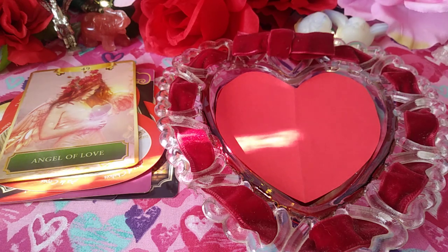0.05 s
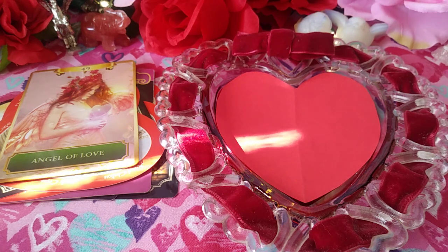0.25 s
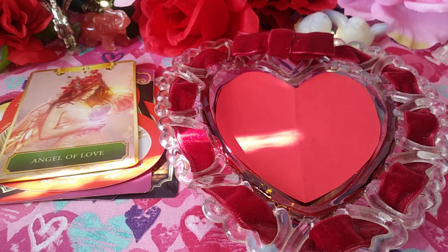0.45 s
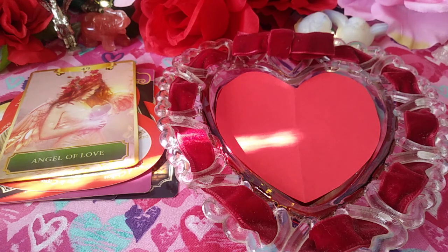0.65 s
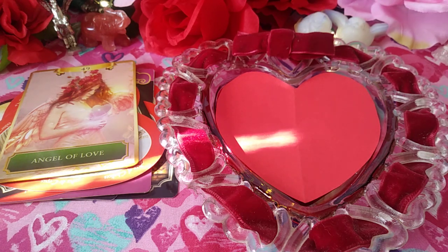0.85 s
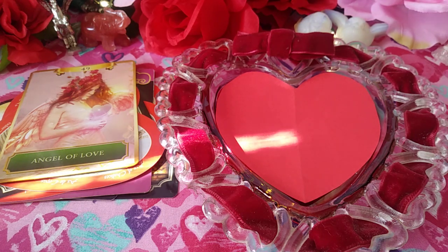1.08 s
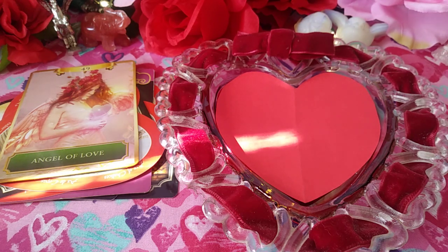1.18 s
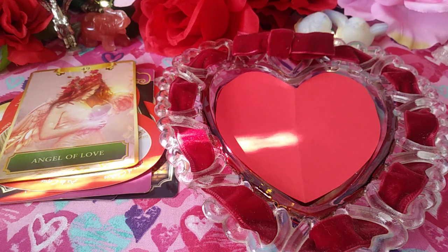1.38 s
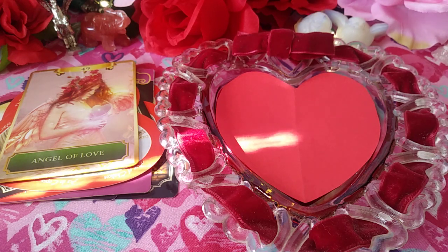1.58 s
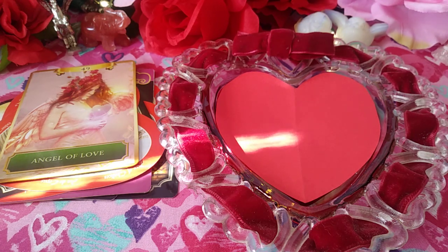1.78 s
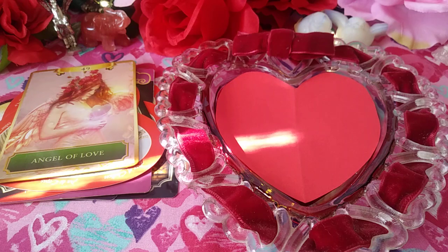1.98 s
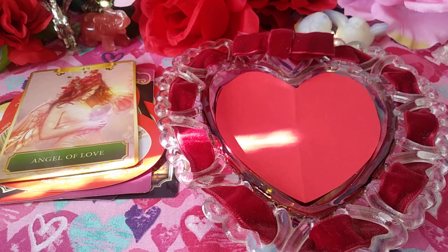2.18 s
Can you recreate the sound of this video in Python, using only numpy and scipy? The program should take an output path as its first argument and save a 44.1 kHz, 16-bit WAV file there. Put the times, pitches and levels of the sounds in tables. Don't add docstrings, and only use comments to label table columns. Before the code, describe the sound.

Small metal charms are stirred by hand in a shallow box on a table, rattling and tinkling brightly, falling nearly quiet, then clinking hard again; close, thin-sounding microphone in a small, fairly dry room.

```python
import sys
import numpy as np
from scipy import signal
from scipy.fft import rfft, irfft
from scipy.io import wavfile
from scipy.ndimage import uniform_filter1d

SR = 44100
rng = np.random.default_rng(int(sys.argv[2]) if len(sys.argv) > 2 else 0)


def convert_level_to_amplitude(level_db):
    exponent = np.asarray(level_db, float) / 20
    return 10 ** exponent


def put_to_file(sound):
    columns = np.atleast_2d(sound).T
    safe = np.clip(columns, -1, 1)
    whole_steps = np.round(safe * 32767)
    wavfile.write(sys.argv[1], SR, whole_steps.astype(np.int16))


N = 98651


def evened(x):
    return x / np.sqrt(np.mean(x ** 2) + 1e-20)


def read(points, hz):
    f, value = np.transpose(points)
    return np.interp(np.log(hz + 1), np.log(f + 1), value)


def add(mix, s, sound):
    part = mix[max(round(s * SR), 0):][:len(sound)]
    part += sound[:len(part)]


def ring(hz, t60, phase=0., size=6000):
    t = np.arange(size) / SR
    return convert_level_to_amplitude(-60 * t / t60) * np.sin(2 * np.pi * hz * t + phase)


def tick(decay_s):
    return rng.standard_normal(300) * np.exp(-np.arange(300) / SR / decay_s)


def knocks(per_s, spread_db):
    hit, size, sign = rng.random((3, N))
    happens = hit < per_s / SR
    force = convert_level_to_amplitude(spread_db * np.minimum(-np.log(size + 1e-9), 3.5))
    return happens * force * np.sign(sign - .5)


def slow_noise(size):
    once = uniform_filter1d(rng.standard_normal(N), size)
    return evened(uniform_filter1d(once, size))


def swarm(train, colour, cycles, tick_db, count):
    which, out = rng.integers(0, count, N), np.zeros(N)
    edges = np.geomspace(colour[0][0], min(colour[-1][0], 16000), count + 1)
    for k in range(count):
        place, damping = rng.random(2)
        hz = edges[k] * (edges[k + 1] / edges[k]) ** place
        turns = cycles * (.5 + 1.3 * damping)
        tap = ring(hz, turns / hz * 3, size=4000)
        tap[:300] += convert_level_to_amplitude(tick_db) * np.diff(tick(0.000087), prepend=0)
        tap *= convert_level_to_amplitude(read(colour, hz)) * np.sqrt(hz) / np.linalg.norm(tap)
        out += signal.oaconvolve(train * (which == k), tap)[:N]
    return evened(out)


# t/s, stirring level/dB, box floor level/dB, small-charm tumbling level/dB
HAND_MOTION = [(0, -26, 0.5, -7), (.12, -27.5, -1, -7.5), (0.219, -22, -2.5, -8), (.45, -28.5, -1, -5),
               (.65, -26.5, -2.5, -3), (.79, -20.5, -6.5, -4), (.92, -25.5, -10.5, -5),
               (.97, -29.5, -11, -8.5), (1.121, -40.5, 2.5, -14), (1.131, -30, 3, -8),
               (1.258, -30, 3.5, -2.5), (1.4, -42.5, 0.5, -4), (1.53, -54.5, 7.5, -6.5),
               (1.669, -43, 2.5, -8), (1.8, -30.5, 2, -3.5), (1.92, -25, -1.5, -6.5),
               (2.08, -24.5, -8, -6.5), (2.24, -31, -3, -10.5)]


def hand(index):
    rows = np.array(HAND_MOTION)
    return np.interp(np.arange(N) / SR, rows[:, 0], rows[:, index])


# f/Hz, level/dB
RATTLE_COLOUR = [(900, -23), (1100, -23.5), (1400, 3.5), (1800, -20.5), (2400, 1), (3200, 0), (5000, -6.5),
                 (7000, -52)]


def rattle(train):
    return convert_level_to_amplitude(-.5) * swarm(train, RATTLE_COLOUR, cycles=11., tick_db=-15, count=32)


# f/Hz, level/dB
SPARKLE_COLOUR = [(3500, -4), (5200, -2.5), (6800, -12), (8500, -7.5), (10800, -3.5), (13000, -8.5),
                  (14800, -16), (16000, -4)]


def sparkle(train):
    tinkle = swarm(knocks(1800, 3.2), SPARKLE_COLOUR, cycles=70., tick_db=-16., count=30)
    colour = convert_level_to_amplitude(read(SPARKLE_COLOUR, np.fft.rfftfreq(N, 1 / SR)))
    dense = knocks(14000, 2.6) + .15 * train
    fizz = evened(irfft(rfft(dense) * colour, N))
    return convert_level_to_amplitude(-3) * tinkle + convert_level_to_amplitude(1.5) * fizz


# f/Hz, bandwidth/Hz, level/dB
BOX_MODES = [(606, 51, -17), (681, 165, -2), (823.5, 118, 8.5), (907, 12, 0.5), (1049, 120, -4),
             (220, 77, -41)]


def box_floor():
    box = sum(convert_level_to_amplitude(db) * np.sqrt(width) * ring(hz, 2.96 / width) for hz, width, db in BOX_MODES)
    return convert_level_to_amplitude(-3.5) * evened(signal.oaconvolve(knocks(1400, 2), box)[:N])


# f/Hz, level/dB, t60/s
PLATE_MODES = [(1279, -4, 0.085), (2131, -2.5, 0.13), (3203, -2.5, 0.12), (4450, -8, 0.075),
               (5830, -23, 0.1), (7180, -30, .08), (9600, -25, 0.058), (11300, -24, 0.045),
               (13630, -33, .07)]


def brushed_charm(effort):
    out = np.zeros(N)
    for hz, db, t60 in PLATE_MODES:
        brush = evened(knocks(700, 2.8)) * effort
        mode = ring(hz, t60 * 0.76) / np.sqrt(t60 * SR / 14)
        out += convert_level_to_amplitude(-4 + db) * signal.oaconvolve(brush, mode)[:N]
    return out


def pile():
    effort = convert_level_to_amplitude(hand(index=1)) * convert_level_to_amplitude(1. * slow_noise(300))
    train = knocks(5000, 2.8)
    out = effort * rattle(train)
    out += convert_level_to_amplitude(hand(index=3)) * effort * sparkle(train)
    out += convert_level_to_amplitude(hand(index=2)) * effort * box_floor()
    return out + brushed_charm(effort)


# t/s, peak level/dB, brightness/(dB per octave), nearer rim + or centre -/dB
STRIKES_ON_PLATE = [(.4339, -16, 4, 1.5), (0.7372, -2.5, -1.5, 1.5), (.8054, -17.5, -3, -3),
                    (.8284, -19.5, -14.5, -2.5), (0.8759, -18.5, -6, 5.5), (.9403, -4.5, 0, 1),
                    (.9847, -10.5, 3, -2.5), (1.0136, -12, 3.5, -0.5), (1.0348, -21.5, 9, 0),
                    (1.0508, -18, 0, 0.5), (1.0618, -34, 2, 2), (1.0696, -34.5, 2, 14),
                    (1.0814, -26, 3, -0.5), (1.899, -17, -4.5, -2), (1.9798, -12.5, -1, -4.5),
                    (1.9938, -5.5, -1.5, -1.5), (2.0146, -35, 13, -4), (2.0353, -21.5, 7, 8),
                    (2.1924, -14, 0.5, -1.5), (2.2195, -32, 16, -3)]


def strikes():
    free_s, choke_db_per_s, catch_s = 0.037, 500, 0.0006
    out, t = np.zeros(N), np.arange(6000) / SR
    choke = convert_level_to_amplitude(-choke_db_per_s * np.maximum(t - free_s, 0))
    ends = np.diff(np.array(STRIKES_ON_PLATE)[:, 0], append=N / SR)
    for (s, db, tilt_db, rim_db), end in zip(STRIKES_ON_PLATE, ends):
        sound = np.zeros(6000)
        for k, (hz, mode_db, t60) in enumerate(PLATE_MODES):
            brightness = tilt_db * min(np.log2(hz / 2500), 1)
            position = -rim_db * (-1) ** k
            sound += convert_level_to_amplitude(mode_db + brightness + position) * ring(hz, t60, rng.random() * .7)
        sound *= choke
        sound[:300] += 1.3 * uniform_filter1d(tick(0.001), size=9)
        caught = np.exp(-np.maximum(t - end, 0) / catch_s)
        add(out, s, convert_level_to_amplitude(db - 5.5) * sound * caught)
    return out


# t/s, peak level/dB, f/Hz
THICK_CLACKS = [(0.0164, -12, 2820), (.0433, -13, 5240), (0.119, -10, 3150), (0.211, -8.5, 2890),
                (0.262, -2.5, 2590), (0.3022, -8, 2470), (0.4962, -6, 3540), (0.358, -12, 2700),
                (.4693, -25, 3270), (0.5621, -8, 4460), (0.6953, -8, 2650), (0.7079, -4, 2500),
                (0.7816, -9, 2300), (0.789, 3, 2450), (0.7947, -3, 3970), (0.8002, -12, 2490),
                (0.885, -7, 2650), (1.13, -12, 2920), (1.1318, -14.5, 3830), (1.226, -13.5, 5040),
                (1.2612, -13, 2960), (1.1511, -14, 3050), (1.183, -13, 2360), (1.3534, -18, 3050),
                (1.4096, -23, 2180), (1.433, -31, 3270), (1.492, -34, 3230), (1.533, -31, 2730),
                (1.6107, -26, 3200), (1.711, -24.5, 3020), (1.626, -32, 3220), (1.6576, -29, 4220),
                (1.7558, -14.5, 3800), (1.7702, -14.5, 3230), (1.8194, -14, 4030), (1.8774, -10, 3600),
                (1.956, -13, 2700), (1.9796, -27, 4700), (1.9822, 4, 3630), (1.9985, -5, 3160),
                (2.011, -9, 3640), (1.9885, -2, 3100), (2.114, -11.5, 4300), (2.1577, -9.5, 4230)]


def clacks():
    t60 = 0.011
    out, rise = np.zeros(N), np.minimum(np.arange(6000) / 20.0, 1)
    for s, db, hz in THICK_CLACKS:
        upper = ring(hz * rng.uniform(1.155, 1.64), t60 * 1.14)
        sound = rise * (ring(hz, t60) + 0.33 * upper)
        sound[:300] += convert_level_to_amplitude(-25) * uniform_filter1d(tick(0.0013), size=4)
        add(out, s, convert_level_to_amplitude(db - 2) * sound)
    return out


# t/s, peak level/dB, f/Hz, t60/s
SMALL_TINKS = [(0.2104, -15, 12000, 0.081), (0.498, -19, 8800, 0.051), (0.598, -13, 11650, 0.15),
               (0.632, -15.5, 9800, 0.18), (0.646, -9, 11240, 0.11), (0.7375, -6.5, 8140, 0.057),
               (0.738, -10, 8950, .06), (.739, -12, 7350, 0.044), (0.7728, -10, 12000, 0.022),
               (0.9264, -15, 13600, 0.078), (.929, -31, 12900, .04), (0.954, -21, 9500, 0.09),
               (1.0254, -24, 12500, 0.065), (1.068, -23.5, 11200, 0.048), (1.098, -31, 10500, 0.084),
               (1.1315, -15, 10000, 0.041), (1.184, -17, 10500, 0.025), (1.2002, -15, 10100, 0.017),
               (1.2625, -20, 10300, 0.03), (1.293, -17.5, 9980, 0.058), (1.5264, -45, 13400, 0.08),
               (1.5529, -39, 15700, 0.06), (1.5738, -34, 11500, 0.05), (1.5988, -43, 15600, 0.06),
               (1.6107, -37, 11100, .03), (1.6362, -32, 10800, 0.033), (1.6953, -21, 14100, 0.03),
               (1.726, -26, 11100, 0.045), (1.8144, -18.5, 11460, 0.073), (1.994, -9, 11100, 0.038),
               (2.123, -9.5, 14000, 0.035), (2.1585, -6, 10100, 0.027), (2.1585, -12, 14100, 0.027),
               (1.1316, -21, 13200, 0.025), (1.2935, -20, 14100, .025), (0.576, -17, 11200, 0.12)]


def tinkles():
    out = np.zeros(N)
    for s, db, hz, t60 in SMALL_TINKS:
        pair, other = rng.random(2)
        t60 = np.clip(t60, .015, .3)
        sound = ring(hz, t60) + 0.31 * ring(hz * (1.3 + 0.048 * pair), t60 * .5)
        sound += .15 * ring(min(hz * (.7 + .7 * other), 15600), t60 * .6)
        sound[:300] += convert_level_to_amplitude(-8) * np.diff(tick(0.0014), prepend=0)
        add(out, s, convert_level_to_amplitude(db - 8) * sound)
    return out


# t/s, peak level/dB, f/Hz, t60/s
FREE_SINGS = [(.13, -31, 4440, 0.13), (.17, -20, 907, 0.54), (.31, -29, 907, 0.34),
              (1.184, -13.5, 2357, 0.086), (.525, -23, 4800, 0.29), (.6, -19, 4810, 0.13),
              (.6684, -11, 4800, 0.074), (.745, -20, 11300, 0.15), (1.027, -31, 5700, 0.13),
              (1.074, -33.5, 7060, .12), (1.087, -32, 5780, 0.14), (1.092, -36, 9500, .1),
              (1.135, -38, 7400, 0.19), (1.208, -20, 13300, 0.12), (1.962, -27, 13300, .1),
              (1.993, -8.5, 4390, 0.089), (1.982, -18, 7060, .05), (1.99, -25, 13700, 0.21),
              (1.995, -11, 9700, 0.042), (2.018, -22, 15900, .15), (2.045, -27, 14300, 0.27),
              (2.126, -24, 10000, 0.077), (2.17, -33, 13600, 0.16)]


def sings():
    rise_s, split_hz = 0.0059, 24
    out, rise = np.zeros(N), np.minimum(np.arange(6000) / SR / rise_s, 1)
    fade = np.cos(np.linspace(0, np.pi / 2, 6000))
    for s, db, hz, t60 in FREE_SINGS:
        partner = ring(hz + split_hz * (.5 + rng.random()), t60)
        add(out, s, convert_level_to_amplitude(db - 4.5) * rise * fade * (ring(hz, t60) + 0.35 * partner))
    return out


def chatter():
    return convert_level_to_amplitude(1.5 * slow_noise(90))


# t/s, peak level/dB
EDGE_SNAPS = [(.4958, -9), (0.561, -24), (0.7363, -20), (0.7995, -5), (.8846, -21), (1.1323, -34),
              (1.182, -28), (1.2002, -11.5), (1.2615, -31), (1.299, -27), (1.492, -31), (1.534, -36),
              (1.5534, -41), (1.5988, -43), (1.6107, -33), (1.626, -41), (1.6566, -47), (1.6786, -38),
              (1.8764, -12), (1.938, -32), (2.1216, -12), (2.142, -28), (2.16, -9)]


def snaps():
    out = np.zeros(N)
    for s, db in EDGE_SNAPS:
        add(out, s, convert_level_to_amplitude(db - 1) * tick(0.0016))
    hz = np.fft.rfftfreq(N, 1 / SR)
    return irfft(rfft(out) * convert_level_to_amplitude(read(SPARKLE_COLOUR, hz) + 3) * np.minimum(hz / 3000, 1), N)


# t/s, peak level/dB
TABLE_THUMPS = [
    (0.004, -58),
    (0.736, -68),
    (0.8, -65),
    (.985, -73),
    (1.131, -84),
    (1.977, -54),
    (2.123, -72),
    (2.158, -70),
    (2.23, -62),
]


def thumps():
    out, u = np.zeros(N), np.arange(3000) / SR / 0.0027
    for s, db in TABLE_THUMPS:
        add(out, s, convert_level_to_amplitude(db + 10) * u * (2 - u) * np.exp(-u))
    return out


def room(x):
    low_t60, treble_t60 = 0.13, 0.19
    t = np.arange(SR // 2) / SR
    taps = rng.standard_normal(len(t)) * (t > .003)
    low = signal.lfilter(*signal.butter(2, 5000, fs=SR), taps)
    tail = low * convert_level_to_amplitude(-60 * t / low_t60) + (taps - low) * convert_level_to_amplitude(-60 * t / treble_t60)
    return signal.oaconvolve(x, tail / np.linalg.norm(tail))[:N]


# f/Hz, level/dB
AIR_COLOUR = [(30, -50), (390, -44), (600, -14), (1000, -6), (1800, -6), (3500, -13), (7000, -25),
              (16000, -34)]


def air():
    hz = np.fft.rfftfreq(N, 1 / SR)
    noise = rfft(rng.standard_normal(N)) * convert_level_to_amplitude(read(AIR_COLOUR, hz))
    return convert_level_to_amplitude(-48.5) * evened(irfft(noise, N))


def scene():
    ceiling = 0.95
    near = pile() + strikes() + chatter() * (clacks() + tinkles()) + chatter() * sings() + snaps()
    heard = ceiling * np.tanh((near + convert_level_to_amplitude(-10) * room(near)) / ceiling)
    cut = np.vstack([signal.butter(6, 200, "high", fs=SR, output="sos"),
                     signal.butter(3, 640, "high", fs=SR, output="sos")])
    return (signal.sosfilt(cut, heard) + air() + thumps())[None]


def low_pass(x):
    return signal.sosfilt(signal.butter(12, 16480, fs=SR, output="sos"), x)


def record(dry):
    fade_s = .004
    fade = np.minimum((N - np.arange(N)) / SR / fade_s, 1)
    top = signal.firwin(511, 15850, window=("kaiser", 9), fs=SR)
    mix = signal.oaconvolve(dry * fade, top[None], "same")
    return low_pass(mix)


dry = scene()
out = record(dry)
put_to_file(out)
```